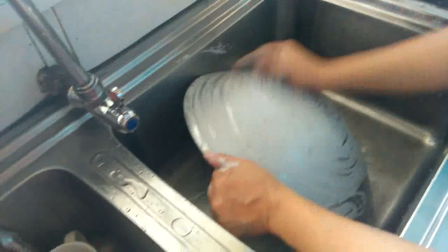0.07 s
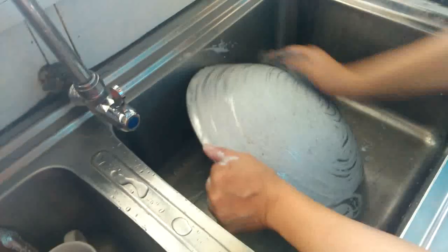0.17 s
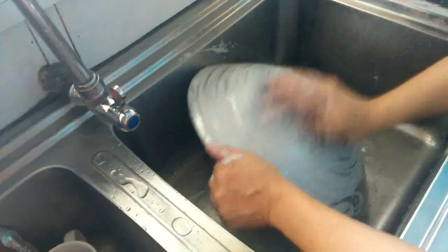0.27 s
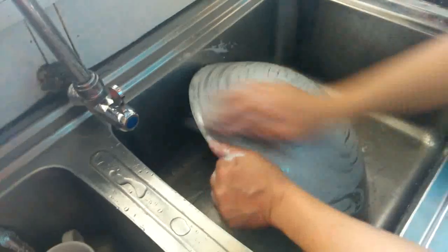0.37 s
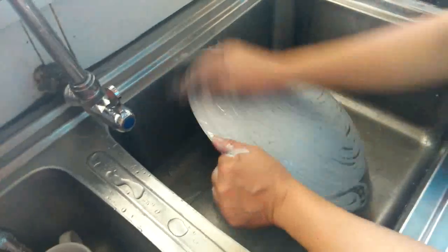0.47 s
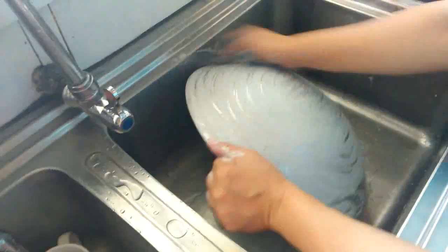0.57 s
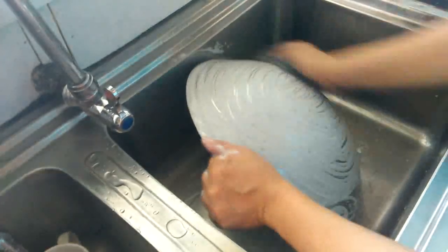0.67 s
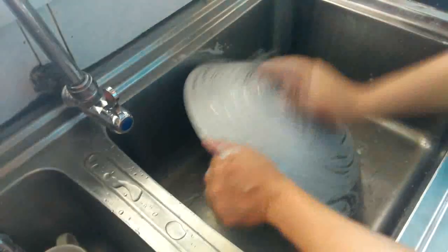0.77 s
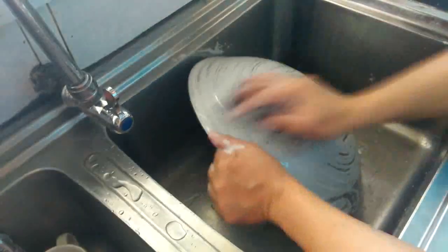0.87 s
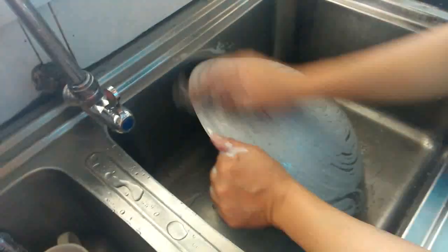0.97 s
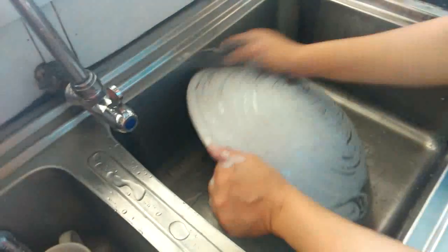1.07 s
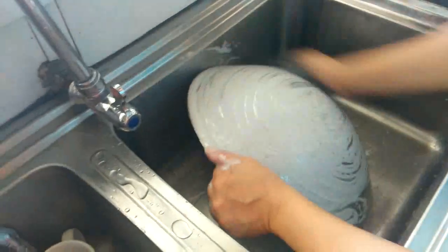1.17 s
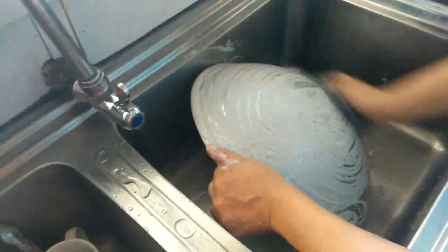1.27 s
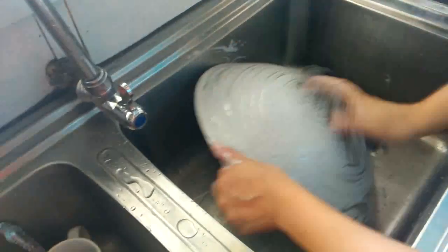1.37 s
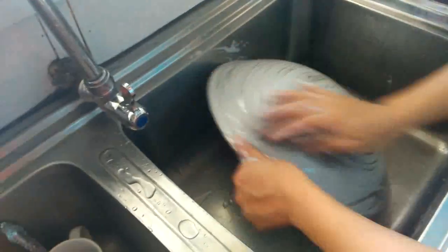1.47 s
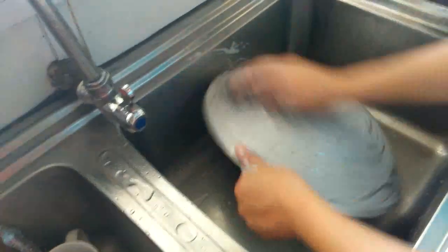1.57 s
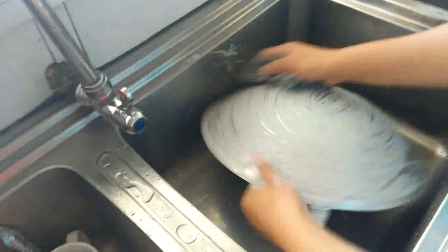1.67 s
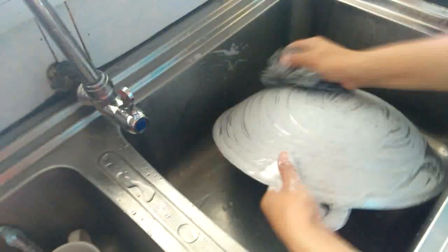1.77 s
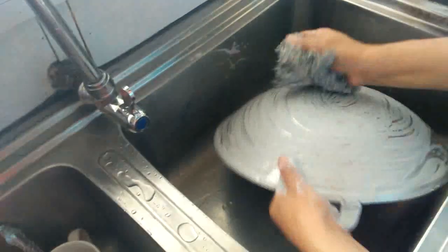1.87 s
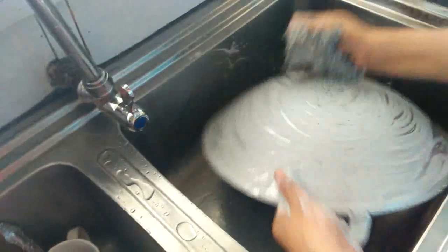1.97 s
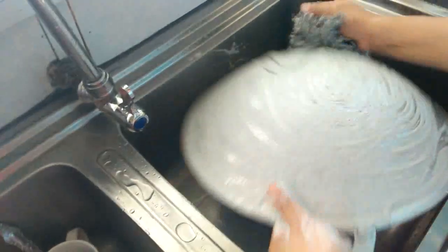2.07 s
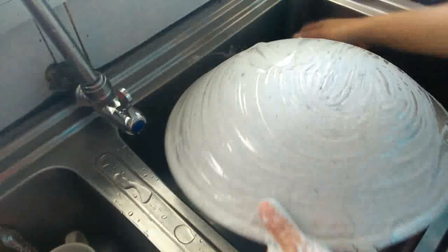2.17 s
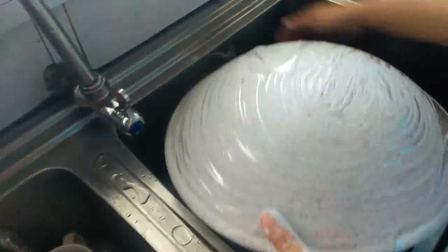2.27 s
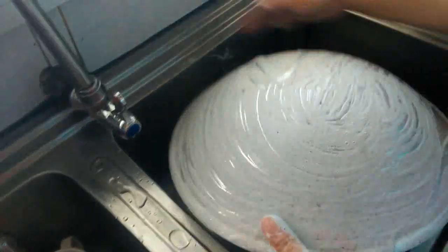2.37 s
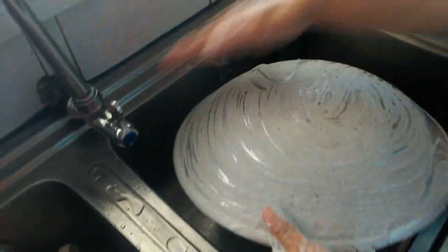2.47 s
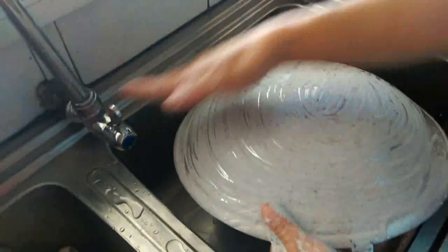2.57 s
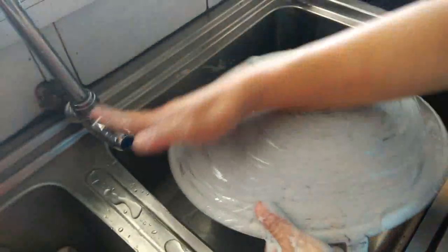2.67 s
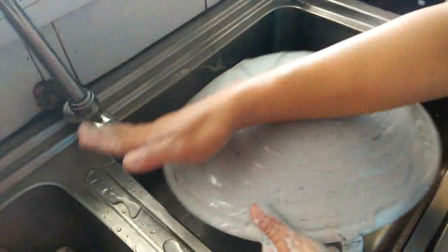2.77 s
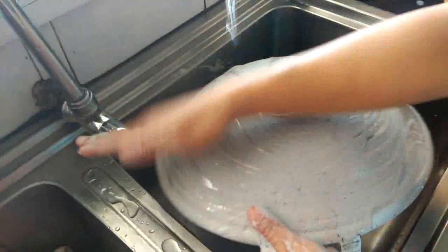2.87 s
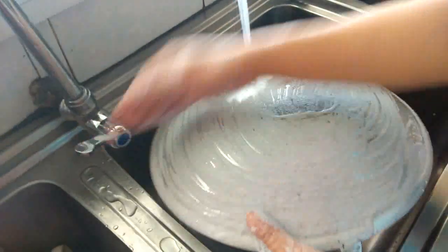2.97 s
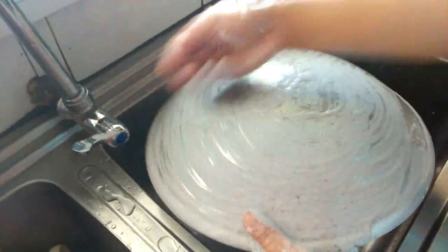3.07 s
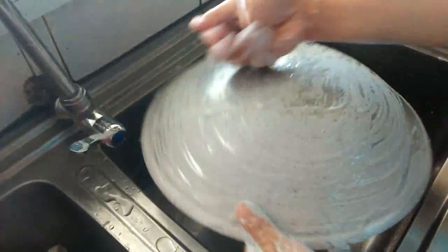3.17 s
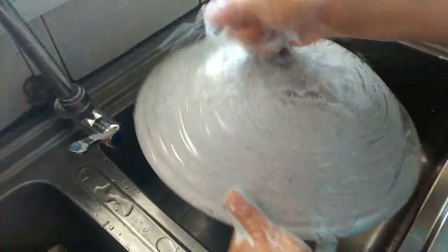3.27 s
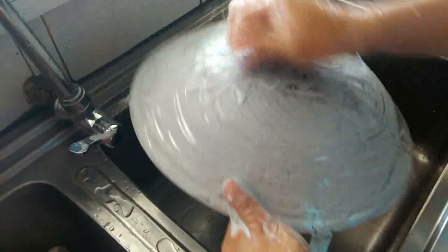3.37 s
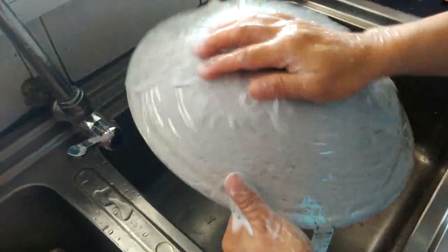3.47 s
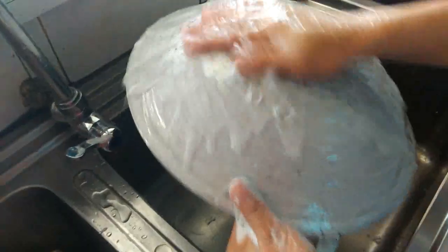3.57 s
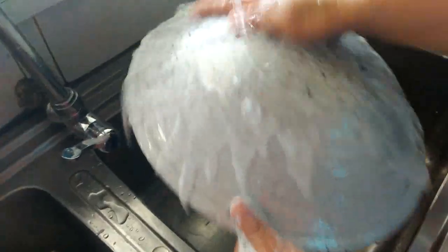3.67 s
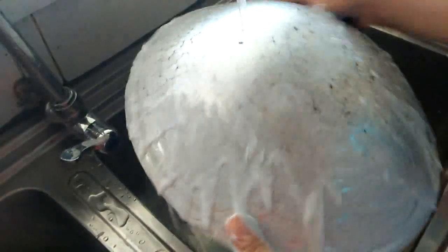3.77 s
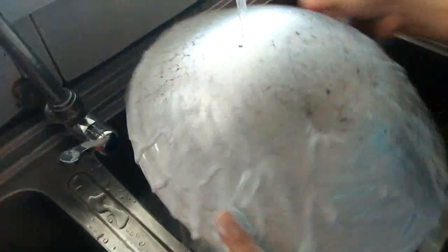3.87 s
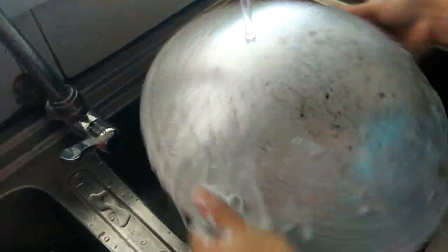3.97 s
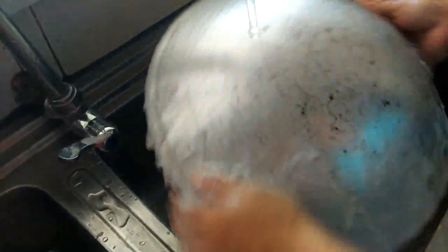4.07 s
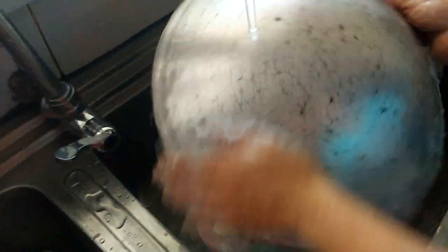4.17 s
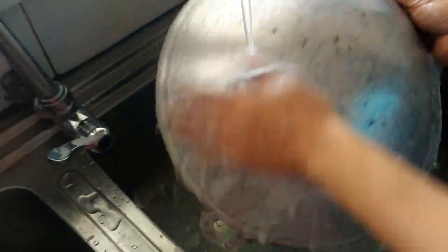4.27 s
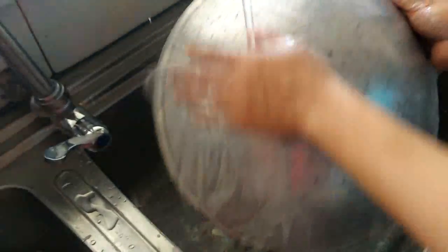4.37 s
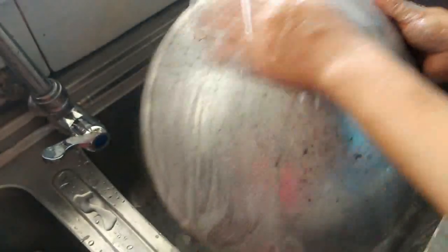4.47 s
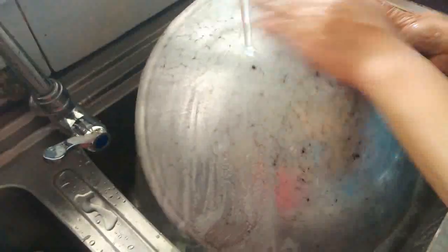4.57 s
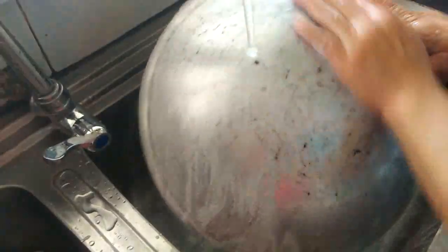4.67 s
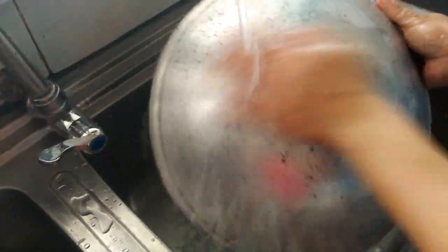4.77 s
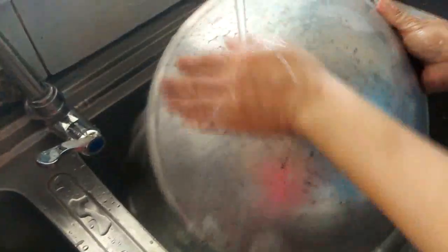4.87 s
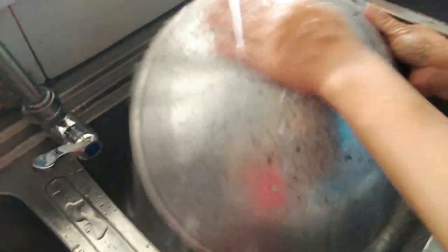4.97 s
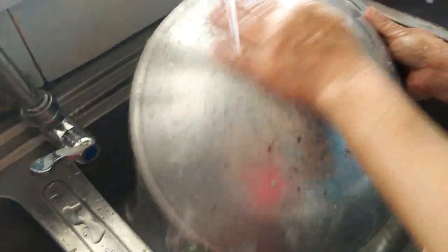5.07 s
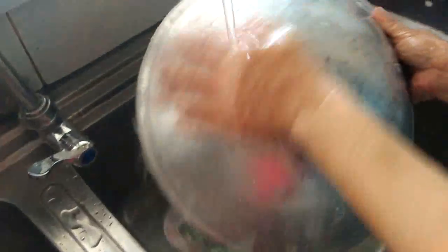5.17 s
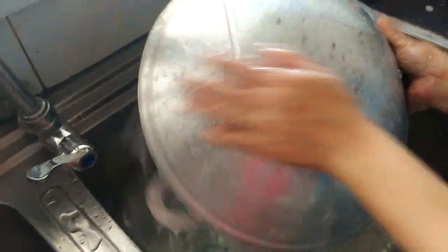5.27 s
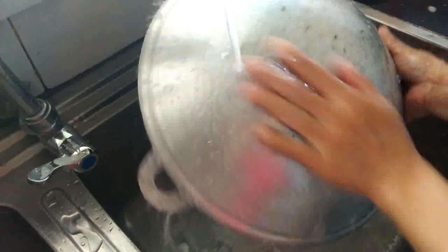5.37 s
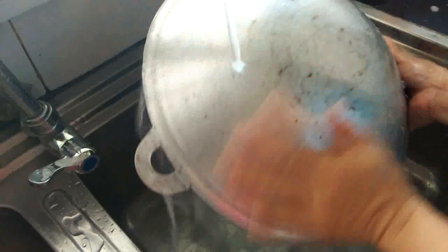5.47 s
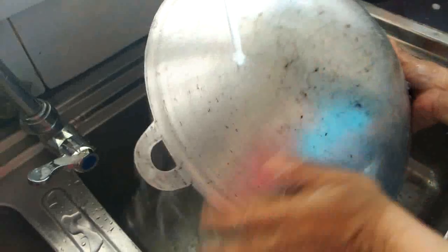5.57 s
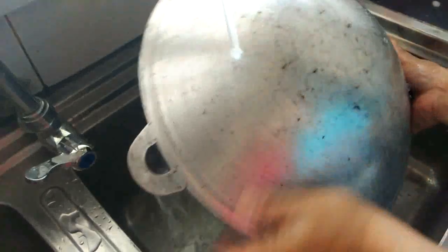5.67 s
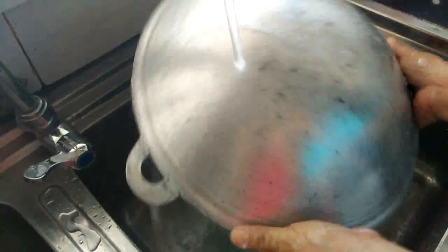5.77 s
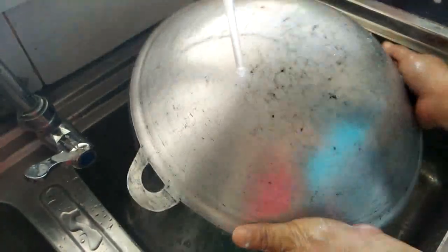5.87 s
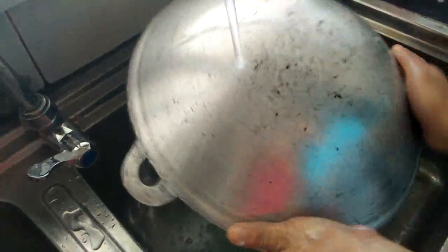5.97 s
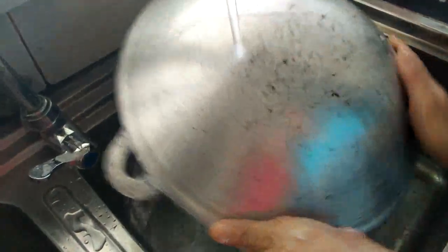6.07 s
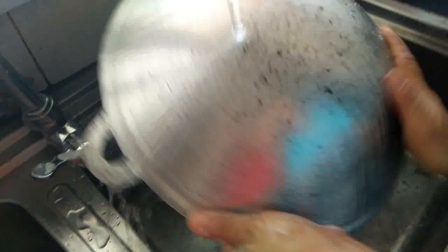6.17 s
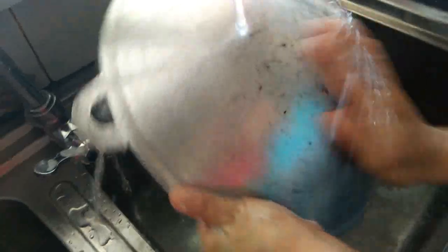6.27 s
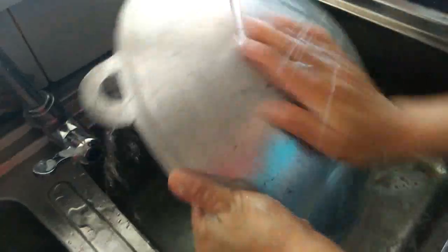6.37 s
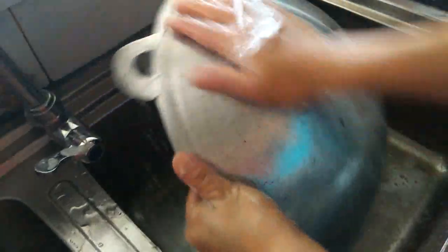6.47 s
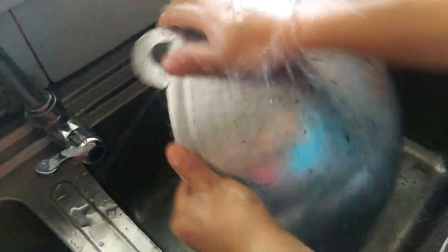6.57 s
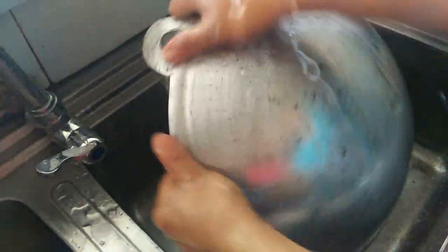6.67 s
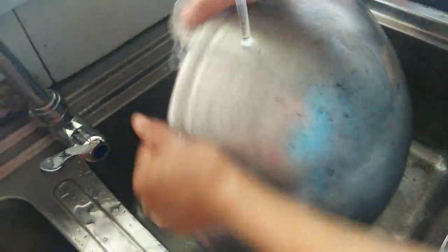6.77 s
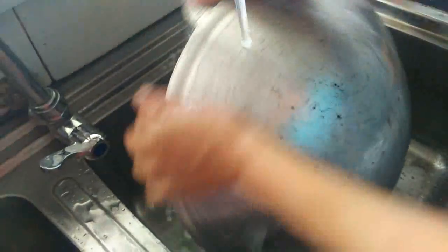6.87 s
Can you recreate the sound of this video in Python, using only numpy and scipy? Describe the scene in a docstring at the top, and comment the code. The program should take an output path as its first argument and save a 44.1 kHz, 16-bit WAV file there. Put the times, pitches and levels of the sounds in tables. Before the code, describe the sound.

A close, dry kitchen-sink scene with short steel reflections and faint, throbbing low hum. At 0 s an upturned metal wok clanks against the basin, with a hollow ring and low boom. Bright, gritty wire-scourer strokes follow at about 0.2, 0.4, 0.7, 0.9, 1.15, 1.4 and 1.7 s, hissing and rasping; a slight groan of the rim comes near 0.5 s and softer knocks around 0.3 and 0.75-0.95 s. A strong, booming knock lands at 1.8 s as the pan is lifted, then a last light scrape at 2.1 s. Around 2.6 s the tap valve whistles thinly, then a weaker whistle falls in pitch. From 3 s water sprays, patters and washes over the dome, with wet slaps, sloshes and gurgles, a metallic knock at 4.6 s, heavier splashes near 5.8 s, and crisp spits of spray until 6.9 s.

```python
"""An upturned wok knocks and rings against a steel sink: each knock sets decaying modes of wok and basin going.
A motor throbs as low swelling noise; a wire scourer hisses and rasps in strokes of random clicks; the rim
groans. Then the valve whistles, in narrow noise that follows a pitch, as the tap opens over the wok; its handle
knocks at its stop. Water hisses, patters and washes over the dome in noise, clicks and bubbles; fine spray
spits, pipes gurgle, and lumps of water slap onto the steel as clusters of short ringing droplets."""
import sys
import numpy as np
from scipy import signal
from scipy.fft import rfft, irfft, next_fast_len
from scipy.io import wavfile

SR = 44100
rng = np.random.default_rng(int(sys.argv[2]) if len(sys.argv) > 2 else 0)


def bounce(signal):
    """Save signal as a 16-bit WAV file at the path given by the first command-line argument."""
    frames = np.transpose(np.atleast_2d(signal))
    limited = np.clip(frames, -1, 1)
    pcm = np.round(limited * 32767).astype(np.int16)
    wavfile.write(sys.argv[1], SR, pcm)


def invert_db(x):
    """Field ratio 10**(x/20) for x, a level in decibels (scalar or array-like)."""
    u = np.asarray(x, float) / 20
    return 10 ** u


N = 304731   # length in samples, about 6.9 s


def rms_one(x):
    """Scale to rms 1."""
    return x / np.sqrt(np.mean(x ** 2) + 1e-20)


def in_time(rows):
    """Columns of a table joined by straight lines, and a mask of its span."""
    s, *columns = np.transpose(rows)
    t = np.arange(N) / SR
    return [np.interp(t, s, c) for c in columns], (t >= s[0]) & (t <= s[-1])


def at_hz(points, hz):
    """Read a spectrum on a log-frequency axis."""
    table_hz, table_db = np.array(points).T
    return np.interp(np.log(np.maximum(hz, 1)), np.log(table_hz), table_db)


def band(x, low, high, order=2):
    """Butterworth band-pass."""
    return signal.sosfilt(signal.butter(order, [low, high], "band", fs=SR, output="sos"), x)


def coloured(x, points):
    """Filter a signal by the spectrum of a table."""
    size = next_fast_len(N)
    hz = np.arange(size // 2 + 1) * SR / size
    return irfft(rfft(x, size) * invert_db(at_hz(points, hz)), size)[:N]


def drift(rate_hz):
    """Slow random wander of rms 1, computed at every 40th sample and joined by lines."""
    r = np.exp(-80 * np.pi * rate_hz / SR)
    noise = rng.standard_normal(N // 40 + 2002)
    slow = signal.lfilter([1], [1, -2 * r, r * r], noise)[2000:]   # skip the settling
    return np.interp(np.arange(N) / 40, np.arange(len(slow)), rms_one(slow))


def ring(clicks, hz, t60):
    """Each unit click sets a sine ringing, from height 1 down by 60 dB in t60 seconds."""
    r, w = invert_db(-60 / (t60 * SR)), 2 * np.pi * hz / SR
    return signal.lfilter([0, np.sin(w)], [1, -2 * r * np.cos(w), r * r], clicks + 1e-18)


def grains(per_s, spread_db):
    """Random clicks of uneven size and either sign; rms 1."""
    sizes = invert_db(spread_db * np.minimum(rng.exponential(1, N), 5)) * rng.choice([-1, 1], N)
    return rms_one(sizes * (rng.random(N) < per_s / SR))


def bursts(seconds, db, t60):
    """Envelope that jumps at each event and dies away."""
    clicks = np.zeros(N)
    at = np.minimum((np.array(seconds) * SR).astype(int), N - 1)
    np.add.at(clicks, at, invert_db(db))
    return signal.lfilter([1], [1, -invert_db(-60 / (t60 * SR))], clicks + 1e-18)


def soft(envelope, rise_s):
    """Round the start of an envelope."""
    r = np.exp(-1 / (rise_s * SR))
    return signal.lfilter([1 - r], [1, -r], envelope)


def patchy(x, low, high, patchy_db, rate_hz):
    """Fifth-octave bands that each swell and fade on their own; rms 1."""
    edges = np.geomspace(low, high, round(5 * np.log2(high / low)) + 1)
    total = 0
    for k, (a, b) in enumerate(zip(edges, edges[1:])):
        # signs alternate so the band edges join
        total = total + (-1) ** k * band(x, a, b) * invert_db(patchy_db * drift(rate_hz))
    return rms_one(total)


def bubbles(per_s, low_hz, high_hz, cycles):
    """Random bubbles, each ringing down over some cycles at one of 14 pitches; rms 1."""
    born, dealt = grains(per_s, spread_db=3.5), rng.integers(0, 14, N)
    pitches = np.geomspace(low_hz, high_hz, 14)
    rings = sum(ring(born * (dealt == k), hz, cycles / hz) for k, hz in enumerate(pitches))
    return rms_one(band(rings, low_hz, high_hz))


# knocks: t/s, crack level/dB, wok ring level/dB, basin boom level/dB, share of wok's weight lifted off (0-1);
# the row at 2.72 s is the tap handle knocking at its stop, nearly all crack
KNOCK_EVENTS = [(0.0, -33.5, -23.5, -41, 0.1), (0.0074, -6.5, -34, -24, 0.07),
                (0.2635, -17.5, -34, -35.5, 0.03), (0.759, -23, -34.5, -36.5, 0.3),
                (0.869, -34, -36, -29.5, 0.3), (0.9, -38, -29, -29.5, 0), (0.931, -53, -46, -29, 0),
                (1.4487, -81, -35, -40.5, 0.53), (1.8213, -17.5, -29, -24, 0.95),
                (1.973, -35.5, -40.5, -29.5, 0.89), (2.394, -45, -56.5, -46.5, 0.73),
                (2.72, -35.5, -87, -65.5, 1), (4.6344, -18.5, -34.5, -49.5, 0.92), (6.58, -59, -58, -73, 0)]
# modes, each table: f/Hz, relative level/dB, typical time to fall 60 dB/s
WOK_RESTING = [(299.4, -1.5, 0.42), (452, -6.5, 0.56), (589, -4, 0.4), (638, -13, 0.88), (706, -9, 0.68),
               (739, -1, 0.18), (763, -13, 0.52), (910, -15, 0.42), (1014, -17, 0.64), (1150, -11, 0.085),
               (1500, -20, 0.16), (1880, -7.5, 0.21), (2640, -3, 0.095), (3160, -17.5, 0.14)]   # wok held by one hand
WOK_LIFTED = [(338.5, -10, 0.65), (481, -9, 0.31), (574, -3, 0.25), (681, -7, 0.15), (820, -9, 0.33),
              (1080, -8.5, 0.41), (1220, -8, 0.15), (1424, -8.5, 0.21), (2040, -11, 0.051),
              (2410, -1, 0.097), (2780, -2.5, 0.11), (2980, -11, 0.16), (3110, -19.5, 0.1)]   # wok held up
WOK_RINSED = [(182.4, -2, .35), (242, 0, 0.15), (423, -9, 0.54), (562, -15, 0.49), (860, -3.5, 0.27),
              (1180, -14, .3), (2040, -25, 0.13), (2283, -11, 0.18), (2850, -8, 0.075)]   # wok tilted under the stream
BASIN_LOADED = [(56.6, -4, 0.71), (83.7, -8, 0.7), (103.2, 0.5, 0.48), (116.2, 3, 0.61), (177.7, -4.5, 0.4)]   # basin under the wok's weight
BASIN_FREE = [(89.7, -7, 1.8), (98.3, 1, 0.77), (118, 10, 0.08), (147.5, -1, 1.36), (199.2, -10, 0.7),
              (326, -14.5, 0.36)]   # basin left to ring
TILTED_FROM_S = 4.0
BOOM_LEAD_S, LEAD_BELOW_HZ = 0.006, 403   # the steel gives way in its low modes before the rim cracks
CONTACT_S = 0.001937   # the rim rolls into contact, so modes start a little apart
SMOTHER = 0.0088   # a soft contact shortens the wok's ring, share per dB
HARD_DB, DULLING = 8, 0.15   # crack over ring of a hard contact; dB per octave lost for each dB short of it
RATTLE_DB, RATTLE_HZ = 3, 35   # the rim chatters on the basin, so the wok's ring is unsteady
CLANG_DB, CLANG_T60_S = -6, 0.25   # dense modes of the wok, relative to its ring


def knocks():
    """Grip and contact point differ at each knock, so every mode gets its own strength, tuning and damping."""
    table, out = np.array(KNOCK_EVENTS), np.zeros(N)
    knock_s, crack_db, ring_db = table.T[:3]
    until_next = np.diff(knock_s, append=N / SR)
    bodies = [(WOK_RESTING, 2, False), (BASIN_LOADED, 3, False), (BASIN_FREE, 3, True),
              (WOK_LIFTED, 2, True), (WOK_RINSED, 2, True)]   # modes, level column, sounds when lifted
    for body, column, lifted in bodies:
        is_wok = column == 2
        chance = rng.standard_normal((len(table), len(body), 3))
        chance *= 0.25 if body is BASIN_FREE else 1   # no hand on the basin
        rattle = invert_db(RATTLE_DB * drift(RATTLE_HZ)) if is_wok else np.ones(N)
        for row, free_s, draws in zip(table, until_next, chance):
            # weight on or off the basin picks the modes
            share = np.clip(row[4] if lifted else 1 - row[4], 0, 1)
            wrong_tilt = is_wok and lifted and (body is WOK_RINSED) != (row[0] > TILTED_FROM_S)
            if share == 0 or wrong_tilt:
                continue
            softness_db = max(HARD_DB - row[1] + row[2], 0)
            for k, ((hz, level_db, t60), (strength, tuning, damping)) in enumerate(zip(body, draws)):
                start = max(row[0] - BOOM_LEAD_S * min(LEAD_BELOW_HZ / hz, 1), 0)
                t60 = t60 * np.exp(0.15 * damping - SMOTHER * softness_db * is_wok)
                level_db = level_db - DULLING * softness_db * max(np.log2(hz / 800), 0)
                t = np.arange(round(min(1.2 * t60, N / SR - row[0] - 0.05) * SR) - 1) / SR
                swell = 1 - np.exp(-t * hz / 0.49)   # a broad push builds a mode up over a cycle or so
                choke_db = 60 * np.maximum(t - free_s, 0) / 0.5   # the next contact stifles the old ring
                wave = np.sin(2 * np.pi * hz * (1 + 0.0095 * tuning) * t)
                if is_wok:
                    # a round pan's modes come in split pairs
                    wave += 0.5 * np.sin(2 * np.pi * hz * (1 + 0.03 * damping) * t)
                    wave *= (-1) ** k   # wok modes start in opposite directions, the basin moves as one
                i = round((start + CONTACT_S * min(abs(tuning), 2)) * SR)
                wave_db = row[column] + level_db + 2.2 * strength - 60 * t / t60 - choke_db
                waver = np.roll(rattle, round(hz * 40))[i:i + len(t)]   # each mode wavers on its own
                out[i:i + len(t)] += np.sqrt(share) * invert_db(wave_db) * swell * wave * waver
    noise = rng.standard_normal((4, N))
    softness_db = np.maximum(HARD_DB - crack_db + ring_db, 0)
    clang = soft(bursts(knock_s, ring_db + CLANG_DB - 0.37 * softness_db, CLANG_T60_S), 0.0037)
    out += clang * patchy(noise[3], 437, 3300, patchy_db=7.0, rate_hz=9.7)
    crack = soft(bursts(knock_s, crack_db - 8, 0.069), 0.0015)
    out += crack * rms_one(band(noise[0], 1700, 3630))
    thud = bursts(knock_s, ring_db - 5.5, 0.46)
    out += thud * rms_one(band(noise[1], 150, 560, order=1))
    bright = soft(bursts(knock_s, crack_db - 16, 0.2), 0.002)
    return out + bright * rms_one(band(noise[2], 5600, 15000))


def basin_echo(x, t60):
    """Short dense reflections between the steel walls, as a decaying noise tail."""
    t = np.arange(round(0.3 * SR)) / SR
    # the small basin returns no bass, wet walls dull the top
    tail = band(rng.standard_normal(len(t)), 350, 7000, order=1)
    tail = tail * invert_db(-60 * t / t60) * (t > 0.002)
    return signal.fftconvolve(x, tail / np.sqrt(np.sum(tail ** 2)))[:N]


# low hum, fuller while water drums the basin: t/s, level/dB
HUM_LEVEL = [(2.7, -64.5), (2.93, -67.5), (4.53, -54.5), (6.91, -61.5)]
# colour of the low hum: f/Hz, relative level per Hz/dB
HUM_SPECTRUM = [(15, -31), (25, 6.5), (54, -13), (145, 5), (181, -1), (221, -18), (295, -6), (370, -34),
                (500, -18), (650, -72.5), (1100, -120)]
THROB_HZ, THROB_PEAK_S = 10.82, 3.286   # the low hum swells this often, one crest at this moment
ROOM_HISS_DB = -77   # soft mid-range hush of the kitchen


def background():
    """Low room noise that throbs with a distant motor, and a steady hush."""
    (hum_db,), _ = in_time(HUM_LEVEL)
    t = np.arange(N) / SR
    throb = invert_db(4.5 * np.cos(2 * np.pi * THROB_HZ * (t - THROB_PEAK_S)))
    hum = rms_one(coloured(rng.standard_normal(N), HUM_SPECTRUM) * throb)
    hush = rms_one(band(rng.standard_normal(N), 300, 3300))
    return invert_db(hum_db) * hum + invert_db(ROOM_HISS_DB) * hush


# scourer strokes: fastest moment t/s, speeding up/s, slowing down/s, wire hiss level/dB, dome rasp level/dB,
# resonance favoured by the spot on the dome f/Hz
SCOUR_STROKES = [(0.191, 0.14, 0.063, -28.5, -33.5, 3080), (0.369, 0.16, 0.15, -28.5, -37.5, 2930),
                 (.69, 0.26, 0.1, -35, -50, 4000), (.89, 0.12, 0.13, -27.5, -44, 2870),
                 (1.149, 0.088, 0.12, -31, -44, 3030), (1.428, 0.14, 0.19, -32, -42, 2870),
                 (1.72, 0.046, 0.14, -38.5, -39.5, 2890), (2.141, 0.089, 0.09, -38, -60, 3900)]
# colour of the wire tips: f/Hz, relative level per Hz/dB
WIRE_SPECTRUM = [(900, -27), (1500, 3.5), (2150, -3.5), (2600, 6.5), (3100, 7.5), (5300, -6.5), (6400, -1),
                 (7700, 7), (10500, 4.5), (14600, 3.5)]
# rasp resonances of the dome: f/Hz, nominal width/Hz, relative level/dB
DOME_MODES = [(2675, 51, -12.5), (2847, 66, -9.5), (3082, 73, -6), (3440, 80, -14.5), (3760, 94, -6.5),
              (4000, 60, -13), (4630, 250, -19)]
# the favoured resonance climbs towards the fastest moment, then sinks; loss one octave off
SWEEP_OCT_PER_S, OFF_SPOT_DB = 0.5, 59.5
STROKE_DROP_DB, STROKE_BEND = 13.5, 1.53   # hiss lost at either end of a stroke; 1 = pointed, 2 = round
RASP_FOLLOWS, RASP_LEAD_S, RUB_DB = 1.14, 0.02, -21   # rasp swings more and bites earlier; rub under hiss
RASP_RISE_SHARE = 0.7   # the wires bite in over this share of the speeding up


def scourer():
    """Thousands of wire tips catch on the metal: bright hiss, a rasp in the dome's resonances, a dull rub."""
    s, rise, fall, hiss_db, rasp_db, spot_hz = np.array(SCOUR_STROKES).T[:, :, None]
    t = np.arange(N) / SR - s

    def slowed_db(t, rise):
        """Level lost as the hand moves slower than at its fastest moment."""
        return STROKE_DROP_DB * np.where(t < 0, -t / rise, t / fall) ** STROKE_BEND

    speed = invert_db(hiss_db - slowed_db(t, rise)).sum(axis=0)
    bite_loss_db = RASP_FOLLOWS * slowed_db(t + RASP_LEAD_S, rise * RASP_RISE_SHARE)
    bites = invert_db(rasp_db - bite_loss_db) + 1e-12
    bite = bites.sum(axis=0)
    # favoured pitch in octaves, averaged over the strokes by their bite
    spot = (bites * (np.log2(spot_hz) - SWEEP_OCT_PER_S * np.abs(t))).sum(axis=0) / bite
    tips = coloured(grains(9000, spread_db=-1.5), WIRE_SPECTRUM)
    hiss = patchy(tips, 4060, 15100, patchy_db=3.0, rate_hz=11.0) * speed * invert_db(1.27 * drift(12))
    catches = grains(2500, spread_db=2.5)
    rasp = np.zeros(N)
    for hz, width, db in DOME_MODES:
        off_spot_db = OFF_SPOT_DB * (np.log2(hz) - spot) ** 2
        mode = rms_one(ring(catches, hz, 4.2 / width))
        rasp += invert_db(db) * mode * invert_db(4.3 * drift(20) - off_spot_db)
    scratch = patchy(tips[::-1], 2300, 4780, patchy_db=3.0, rate_hz=12)
    rasp = rms_one(rms_one(rasp) + 0.9 * scratch) * bite
    rub = rms_one(band(rng.standard_normal(N), 250, 5200)) * speed * invert_db(RUB_DB)
    return hiss + rasp + rub


GROAN_S, GROAN_LENGTH_S, GROAN_DB = 0.515, 0.11, -46   # the rim slips on the basin


def groan():
    """Uneven slips of the rim shake the wok's middle modes."""
    i, n, out = round(GROAN_S * SR), round(GROAN_LENGTH_S * SR), np.zeros(N)
    slips = band(grains(400, spread_db=3.0), 720, 1050)[:SR]
    shaken = sum(ring(slips, hz, 0.06) for hz, _, _ in WOK_RESTING)[-n:]
    t = np.arange(n) / n   # 0-1 over the groan
    shape = np.minimum(t / 0.13, 1) * (1 - t) ** 0.81
    out[i:i + n] = invert_db(GROAN_DB) * rms_one(shaken) * shape
    return out


# flow of the tap, as spray: t/s, level/dB
TAP_FLOW = [(2.45, -91), (2.53, -88.5), (2.575, -70.5), (2.69, -76), (2.74, -76), (2.83, -69),
            (2.87, -65.5), (2.95, -61.5), (3.03, -54.5), (3.4, -56), (3.62, -50.5), (3.85, -57.5),
            (4.4, -51), (5.2, -51.5), (5.27, -59.5), (5.4, -47.5), (5.6, -58), (5.7, -45), (5.85, -48),
            (5.98, -65), (6.12, -49), (6.3, -53), (6.6, -53), (6.91, -55.5)]
# sloshes of water pushed over the dome: t/s, level/dB
SLOSH_EVENTS = [(2.73, -62.5), (2.999, -52), (3.088, -48.5), (3.27, -57.5), (3.46, -60), (3.54, -56.5),
                (3.668, -45.5), (3.87, -62.5), (4.0, -69), (4.615, -42), (6.09, -68), (6.569, -47.5),
                (6.83, -61)]
# colour of the water: f/Hz, relative level per Hz/dB
WATER_SPECTRUM = [(120, -39), (300, 8), (370, -18.5), (600, -9), (1290, -6), (1700, -12.5), (2650, 6),
                  (4400, 0.5), (5600, 8), (7700, 16), (10500, 13), (14600, 11.5)]
PATTER_DB, WASH_DB, WASH_FOLLOWS = -11.5, -66.5, 0.28   # patter under spray; wash at mean flow, share of swing
PATTER_AFTER_SLAP_DB, PATTER_T60_S = -20, 0.05   # each slap leaves a scatter of drops
SURGE_DB = 2.0   # unsteadiness of the spray
SLOSH_RISE_S, SLOSH_T60_S = 0.0058, 0.36


def stream():
    """The stream breaks into spray, patters on steel and washes over the dome, in droplets and bubbles."""
    (spray_db,), on = in_time(TAP_FLOW)
    slap_s, slap_db = np.array(SLAP_EVENTS).T[:2]
    slosh_s, slosh_db = np.transpose(SLOSH_EVENTS)
    surge = drift(30.0)
    drops = coloured(grains(10000, spread_db=3.0), WATER_SPECTRUM)
    spray = patchy(drops, 4600, 16000, patchy_db=1.8, rate_hz=14)
    spray += 0.22 * bubbles(500, 4500, 12000, cycles=60)
    large_drops = coloured(grains(2500, spread_db=2.5), WATER_SPECTRUM)
    patter = patchy(large_drops, 2540, 4800, patchy_db=2.0, rate_hz=21)
    patter += 1.1 * bubbles(200, 2200, 5500, cycles=45)
    sheet = coloured(rng.standard_normal(N), WATER_SPECTRUM)
    wash = patchy(sheet, 312, 2190, patchy_db=4.5, rate_hz=14.5)
    wash += 0.35 * bubbles(70, 450, 2000, cycles=30)
    lumps_db = 1.2 * surge + 2.2 * drift(30)
    scatter = soft(bursts(slap_s, slap_db + PATTER_AFTER_SLAP_DB, PATTER_T60_S), 0.001)
    dripping = invert_db(spray_db + PATTER_DB) + scatter
    flow_swing_db = spray_db - spray_db[on].mean()
    sloshing = soft(bursts(slosh_s, slosh_db, SLOSH_T60_S), SLOSH_RISE_S)
    washing = invert_db(WASH_DB + WASH_FOLLOWS * flow_swing_db) + sloshing
    return (spray * invert_db(spray_db + SURGE_DB * surge) + patter * dripping * invert_db(lumps_db) + wash * washing) * on


# valve whistles, one nearly steady and one mostly falling: t/s, f/Hz, level/dB
STEADY_WHISTLE = [(2.55, 2950, -74), (2.57, 2960, -51.5), (2.6, 2940, -50), (2.62, 3010, -57),
                  (2.655, 2900, -62), (2.71, 3000, -79), (2.73, 3080, -81)]
FALLING_WHISTLE = [(2.56, 5200, -80), (2.64, 4890, -76), (2.68, 4310, -68), (2.72, 3320, -62),
                   (2.75, 2680, -63), (2.77, 2740, -81)]


def whistle(rows, width_hz):
    """Water squeezing through the valve: a narrow band of noise that follows a pitch."""
    (hz, db), on = in_time(rows)
    phase = 2 * np.pi * np.cumsum(hz) / SR
    tone = drift(width_hz) * np.cos(phase) + drift(width_hz) * np.sin(phase)
    return invert_db(db + 3.2 * drift(46)) * on * tone


# bright spits of spray: t/s, level/dB, centre f/Hz
SPIT_EVENTS = [(2.719, -40.5, 7100), (2.7205, -48, 12600), (3.179, -36, 7800), (3.872, -42, 4870),
               (4.0123, -46, 12700), (4.444, -37, 7750), (5.151, -32.5, 5560), (5.3902, -29.5, 9700),
               (5.4662, -29.5, 9400), (6, -31.5, 7260), (6.116, -30, 7400), (6.2281, -28, 7760),
               (6.3237, -35.5, 8250), (6.357, -33.5, 10240), (6.4313, -32, 6640), (6.7442, -31, 8300),
               (6.8703, -32, 7600)]


def spits():
    """Fine spray bursts, each in a band of its own."""
    out, t = np.zeros(N), np.arange(round(0.15 * SR)) / SR
    for (s, level_db, hz), noise in zip(SPIT_EVENTS, rng.standard_normal((len(SPIT_EVENTS), len(t)))):
        i = round(s * SR)
        puff = rms_one(band(noise, hz / 1.08, min(hz * 1.04, 0.45 * SR), order=1))
        shape = invert_db(level_db - 8.0 - 60 * t / 0.087) * np.minimum(t / 0.0015, 1)
        out[i:i + len(t)] += (shape * puff)[:N - i]
    return out


# short wet hums and gurgles from hand, pipe and basin: t/s, length/s, f/Hz, nominal width/Hz, level/dB
GURGLE_EVENTS = [(2.777, 0.34, 1280, 240, -67.5), (2.985, 0.15, 2040, 51, -53),
                 (3.022, 0.079, 1210, 340, -58), (3.102, 0.13, 408, 15, -56), (3.261, 0.07, 724, 100, -51),
                 (3.267, 0.051, 1500, 340, -46), (3.463, 0.11, 286, 4.9, -56.5),
                 (3.434, 0.089, 1420, 190, -56.5), (3.497, 0.035, 700, 280, -60),
                 (3.544, 0.02, 1420, 230, -48), (3.621, 0.022, 1380, 240, -53),
                 (3.665, 0.1, 1430, 200, -48.5), (4.14, 0.083, 289, 12, -53),
                 (4.23, 0.078, 820, 330, -59.5), (4.321, .11, 810, 1100, -55),
                 (4.338, 0.13, 237, 12, -55.5), (5.3, 0.18, 580, 88, -56.5),
                 (5.44, 0.022, 1135, 110, -54.5), (5.736, 0.075, 299.3, 6.2, -56.5),
                 (6.084, 0.037, 800, 600, -59), (6.129, 0.033, 790, 430, -59.5),
                 (6.206, 0.051, 1316, 140, -54.5), (6.427, 0.023, 1800, 470, -56),
                 (6.468, 0.027, 1400, 710, -59), (6.599, 0.055, 323, 5.3, -55.5),
                 (6.778, 0.059, 1420, 610, -53), (6.837, 0.08, 900, 110, -55)]


def gurgles():
    """Each is a narrow band of noise that swells, stutters and fades."""
    out, broken_db = np.zeros(N), 0.96 * drift(62)
    for s, length, hz, width_hz, db in GURGLE_EVENTS:
        i, n = round(s * SR), round(length * SR)
        tone = rms_one(ring(rng.standard_normal(SR), hz, 7.3 / width_hz)[-n:])
        swell = np.sqrt(np.hanning(n))
        out[i:i + n] += invert_db(db + broken_db[i:i + n]) * (tone * swell)[:N - i]
    return out


# lumps of water landing on steel: t/s, slap level/dB, ring f/Hz, spray burst level/dB
SLAP_EVENTS = [(3.0082, -40.5, 2040, -51), (3.0651, -36.5, 2040, -66), (3.286, -28.5, 2510, -47.5),
               (3.452, -34, 3210, -48), (3.4711, -30.5, 3060, -69), (3.551, -30, 2700, -47),
               (3.5798, -31.5, 2300, -66), (3.61, -31.5, 3360, -50), (3.683, -29, 1830, -41),
               (3.7, -37, 2900, -55), (3.722, -35.5, 3650, -52), (4.011, -21, 2670, -41.5),
               (4.206, -29.5, 2640, -67), (4.2335, -33.5, 3080, -74), (4.29, -31.5, 2660, -70),
               (4.3614, -31.5, 2640, -39.5), (4.382, -28, 2550, -54), (4.5204, -25.5, 2830, -41),
               (4.607, -32, 2640, -48), (4.8578, -27, 2820, -39.5), (4.9428, -34, 2820, -51),
               (5.001, -32.5, 2700, -37.5), (5.061, -26, 2800, -46), (5.117, -32, 3010, -61),
               (5.1512, -35, 3200, -40), (5.184, -33.5, 3140, -57), (5.2497, -35.5, 2390, -45),
               (5.376, -38, 3800, -39), (5.6984, -27.5, 2640, -52), (5.713, -32, 2660, -40),
               (5.7841, -20.5, 3130, -39), (5.841, -54, 3150, -36.5), (5.871, -28, 2630, -43),
               (5.928, -31.5, 2670, -44), (6.298, -36, 2860, -48), (6.334, -29, 2720, -60),
               (6.423, -31, 3230, -68), (6.469, -32.5, 2700, -52), (6.668, -37, 2940, -63),
               (6.733, -30, 2800, -40), (6.777, -41, 2570, -45), (6.7972, -30.5, 2450, -68),
               (6.8747, -32.5, 2830, -35)]


def slaps():
    """A lump lands as a few quick droplets, each ringing some cycles near the lump's pitch; spray flies off."""
    out, table = np.zeros(N), np.array(SLAP_EVENTS)
    slap_s, slap_db, _, burst_db = table.T
    t = np.arange(round(0.06 * SR)) / SR
    envelope = 1.26 * (1 - np.exp(-t / 0.0013)) * np.exp(-t / 0.0026)
    for (s, level_db, hz, _), (late, detune, size) in zip(table, rng.random((len(table), 3, 6))):
        lags = late * 0.03 - 0.009
        pitches = hz * (1 + 0.36 * (detune - 0.5))
        lags[0], pitches[0], size[0] = 0, hz, 1   # the biggest droplet marks the moment
        for k, (lag, pitch, height) in enumerate(zip(lags, pitches, size)):
            droplet = envelope * np.sin(2 * np.pi * pitch * t)
            droplet_db = level_db - 1.0 * (k > 0) - 490 * abs(lag)
            i = round((s + lag) * SR)
            out[i:i + len(t)] += (invert_db(droplet_db) * height * droplet)[:max(N - i, 0)]
    fizz = coloured(grains(6500, spread_db=1.0), WATER_SPECTRUM)
    splash = soft(bursts(slap_s, slap_db - 15, 0.09), 0.005)
    out += splash * patchy(fizz, 2000, 4600, patchy_db=2.5, rate_hz=13.4)
    flying = soft(bursts(slap_s, burst_db - 1.5, 0.13), 0.008)
    return out + flying * patchy(fizz[::-1], 4400, 16000, patchy_db=3.5, rate_hz=12)


# stereo width: f/Hz, side minus mid level/dB
STEREO_WIDTH = [(100, -60.5), (1000, -45), (2500, -34), (4000, -23.5), (5500, -15), (7000, -10),
                (10000, -4), (14500, -6)]


def scene():
    """All sources lie ahead; mostly the treble differs between the two close microphones, and restlessly."""
    near = knocks() + groan() + slaps() + spits()
    wet = gurgles() + whistle(STEADY_WHISTLE, width_hz=35) + whistle(FALLING_WHISTLE, width_hz=220)
    echo = invert_db(-11.0) * basin_echo(near, t60=0.41)
    mid = near + echo + wet + scourer() + stream() + background()
    turn = 2 * np.pi * drift(25)   # wandering phase of the side signal
    wide = signal.hilbert(coloured(mid, STEREO_WIDTH), next_fast_len(N))[:N]
    side = np.real(wide * np.exp(1j * turn))
    return np.array([mid + side, mid - side])


def roll_off(x):
    """The treble ends steeply here."""
    return signal.sosfilt(signal.butter(12, 15560, fs=SR, output="sos"), x)


def record(dry):
    """The microphone drops the deepest bass, and a steep filter cuts the top."""
    bass_cut = signal.butter(4, 48, "high", fs=SR, output="sos")
    top_cut = signal.cheby2(20, 60, 14750, fs=SR, output="sos")
    mix = signal.sosfilt(np.vstack([bass_cut, top_cut]), dry)
    return roll_off(mix)


dry = scene()
out = record(dry)
bounce(out)
```